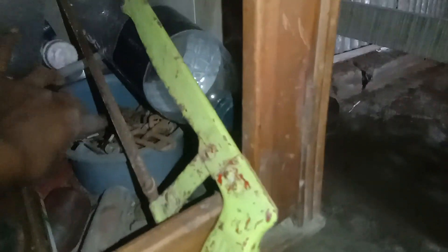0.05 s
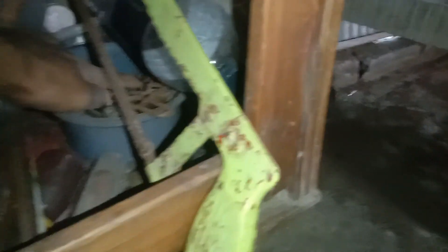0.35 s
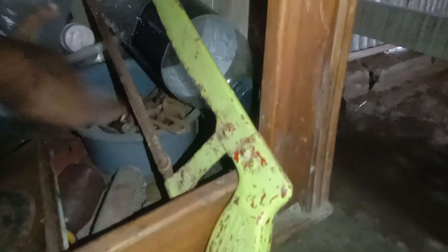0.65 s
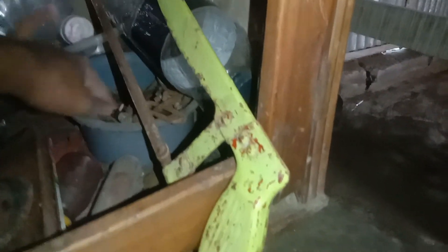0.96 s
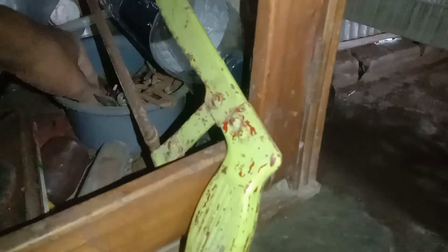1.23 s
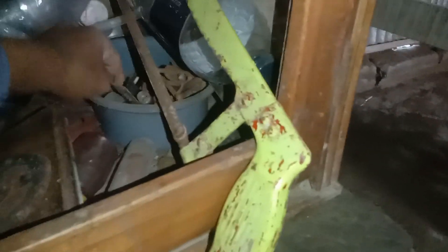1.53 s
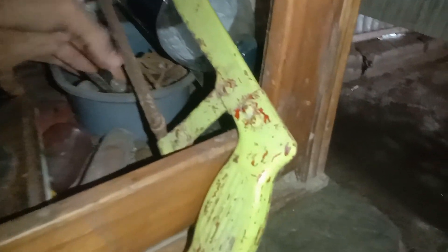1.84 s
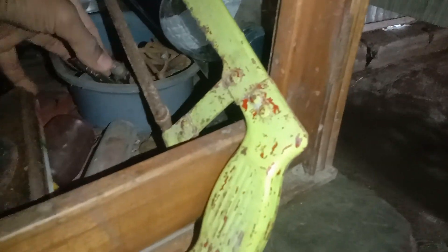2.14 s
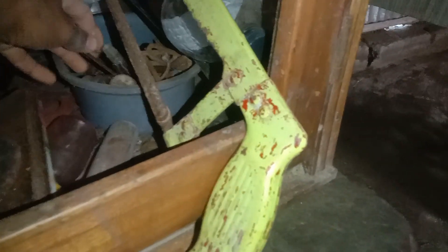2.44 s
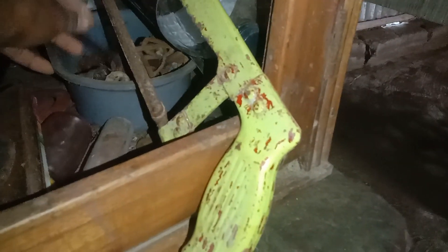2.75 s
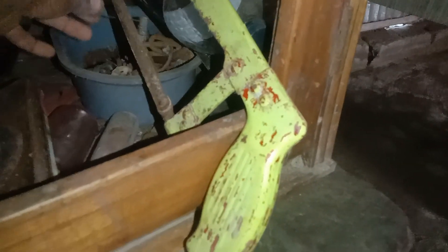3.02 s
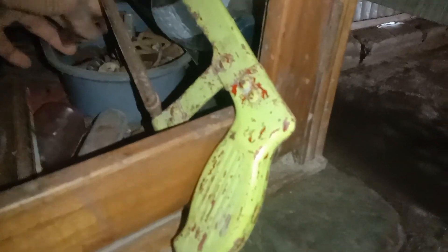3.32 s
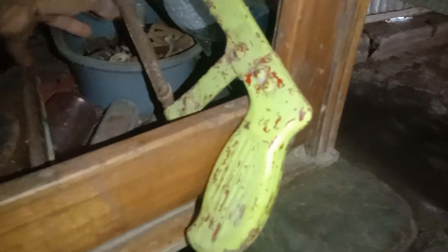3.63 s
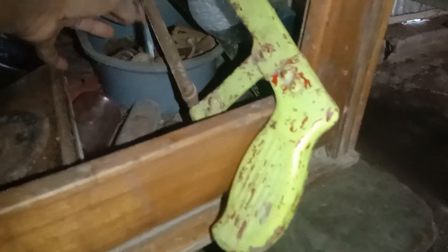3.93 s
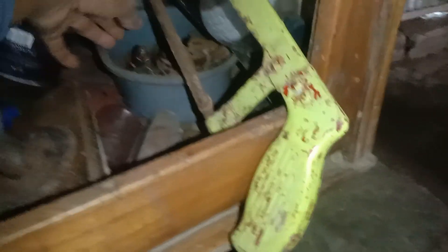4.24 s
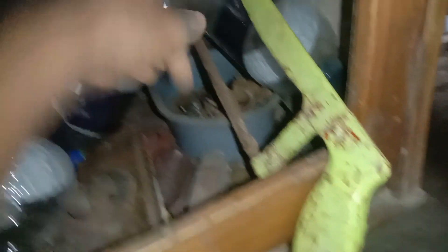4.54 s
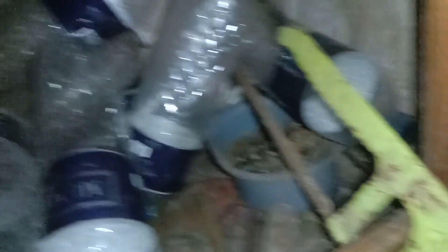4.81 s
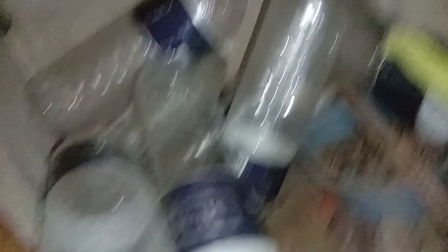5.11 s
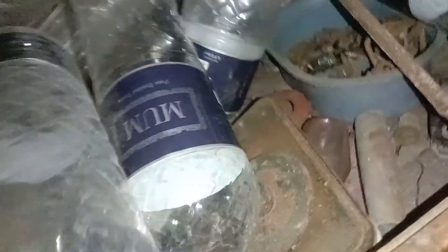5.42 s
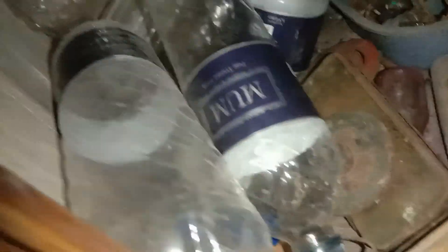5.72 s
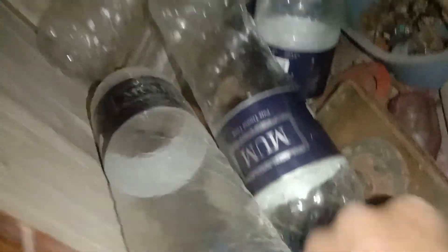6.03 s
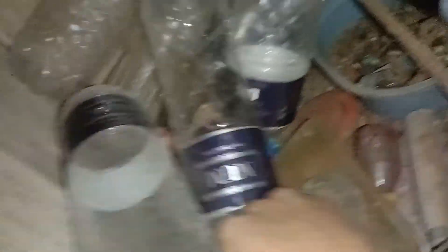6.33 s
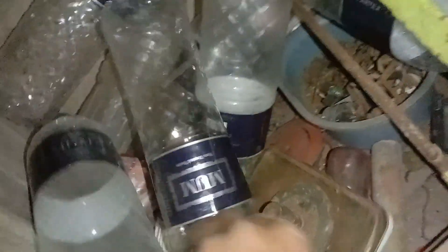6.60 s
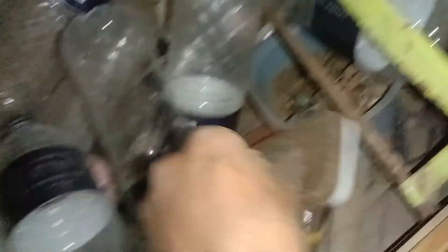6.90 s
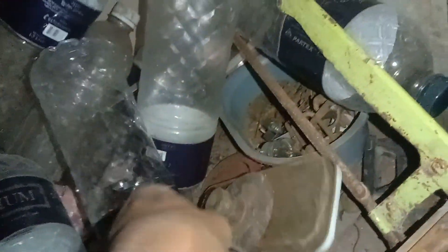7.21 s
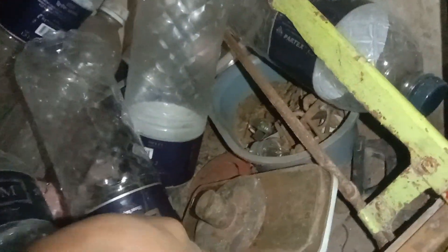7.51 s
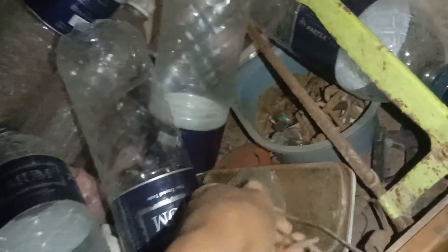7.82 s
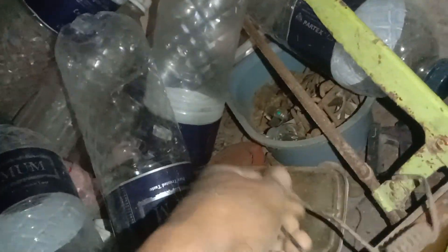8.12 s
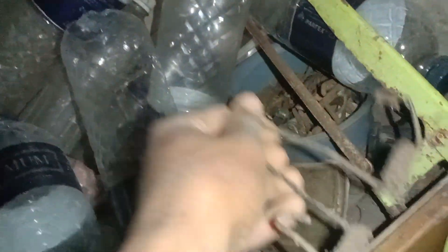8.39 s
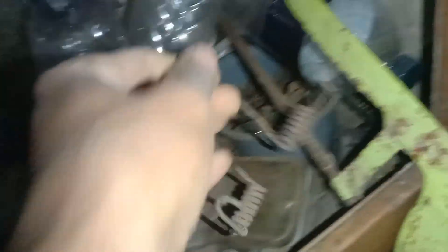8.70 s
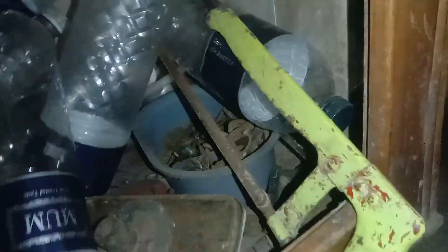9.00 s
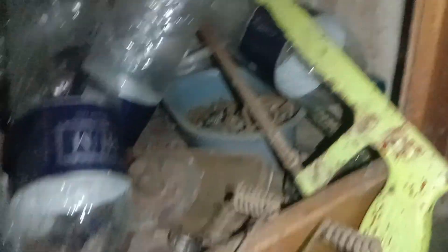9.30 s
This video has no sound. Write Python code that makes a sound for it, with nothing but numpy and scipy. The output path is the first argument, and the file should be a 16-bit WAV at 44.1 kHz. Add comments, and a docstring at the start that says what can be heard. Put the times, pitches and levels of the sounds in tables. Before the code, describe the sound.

Close up in a small, quiet room, old iron pieces clatter and scrape inside a plastic tub, small parts ringing thinly as the tub knocks on wooden boards. The rummaging thins out and stops briefly. Then empty plastic bottles buckle, rub and bump as they are pushed around with a tray. A far engine hums barely audibly, and a piece of iron lands on the plastic tray with a clank and a short tumble.

```python
"""Scrap iron clatters in a plastic tub as a hand rummages through it, and small parts ring thinly.
The hand draws back with a swish, then shoves empty plastic bottles and a tray aside in a wooden cupboard.
Each hit is a snap and a short chatter, each push a stick-slip scrape, coloured by the hollow plastic.
At the end an iron piece drops and tumbles on the tray. The room is small; far away an engine speeds up."""
import sys
import numpy as np
from scipy import signal
from scipy.fft import rfft, irfft
from scipy.io import wavfile
from scipy.ndimage import uniform_filter1d

SR = 44100
rng = np.random.default_rng(int(sys.argv[2]) if len(sys.argv) > 2 else 0)


def output_pcm(signal):
    """Save a mono or channel-first signal as 16-bit PCM at the path in sys.argv[1].

    Samples are clipped to [-1, 1] before scaling.
    """
    pcm = np.clip(np.atleast_2d(signal).T, -1, 1) * 32767
    wavfile.write(sys.argv[1], SR, np.round(pcm).astype(np.int16))


N = 412322
TIME = np.arange(N) / SR
TOP_HZ = 15900

# Iron clashing in the tub. Each row: start in seconds, level in dB, bass and treble in dB
# against the mids, chatter decay time in seconds.
IRON_CLACKS = [(0.0, -10.5, -9, -9.5, 0.0029), (0.035, -11.5, -9, -35, 0.0035),
               (0.221, -16, 2, -12, 0.0032), (0.253, -17, 8.5, -13.5, 0.0055),
               (0.304, -16, -19.5, -13, 0.0072), (0.376, -12.5, -6.5, -18.5, 0.0079),
               (0.675, -13, -24.5, -26.5, 0.0048), (0.683, -15.5, -24, -18, 0.007),
               (0.694, -7.5, -23, -4.5, 0.0035), (0.722, -2, -12.5, -22.5, 0.0077),
               (0.865, -11.5, -20, -15.5, 0.0042), (0.889, -7, -18.5, -20.5, 0.0037),
               (0.985, -18.5, 1, -30, .005), (0.998, -10.5, -27, -18, 0.0021),
               (1.022, -6, -45, -8.5, 0.0037), (1.19, -22, -10, -47, 0.0028),
               (1.336, -21, -29, -12, 0.0076), (1.426, -7, -22, -49, 0.0033),
               (1.525, -11.5, -6.5, -35, 0.012), (1.588, -11.5, -2.5, -26, 0.011),
               (1.622, -3, -40, -12, 0.0045), (1.702, -24.5, 5, -17, 0.012),
               (1.768, -19.5, -13, -28, 0.012), (1.795, -22.5, -28.5, -19, 0.0069),
               (1.848, -22, -3, -26.5, 0.0042), (1.979, -19, -18.5, -31, .008),
               (2.079, -48, -21, 4, 0.0051), (2.129, -15.5, -18.5, -22.5, 0.0043),
               (2.235, -38, -17, 0.5, 0.0036), (2.281, -8.5, -8.5, -31, 0.0059),
               (2.316, -19.5, -0.5, -21, 0.0059), (2.354, -23.5, -13.5, -28, 0.021),
               (2.393, -24, -25.5, -6, 0.0072), (2.432, -18, -13.5, -30, .008),
               (2.464, -19, -21.5, -14.5, 0.0022), (2.521, -19, -18.5, -19.5, .005),
               (2.55, -22, -2, -44.5, 0.0069), (2.83, -15.5, -29, -11, 0.0081),
               (2.853, -16, -34.5, -7.5, 0.0087), (2.888, -19.5, -8, -10, 0.0051),
               (2.975, -24.5, 1, -31, 0.0061), (3.04, -25.5, 1, -13.5, .005),
               (3.103, -30, -10.5, -36, 0.0099), (3.274, -44.5, -29.5, -1, 0.0054),
               (3.439, -23.5, -6.5, -15, 0.0061), (3.723, -29, -8.5, -18.5, .012),
               (3.874, -23, -28.5, -13, 0.0025), (3.955, -31.5, -31.5, 0, 0.004),
               (3.994, -13, -51, -12.5, 0.0046), (4.02, -14.5, -42, -21, 0.0045),
               (4.08, -20.5, -26, -13, 0.0021), (4.113, -17.5, -11, -9, 0.0071),
               (4.258, -28.5, -7, -7, 0.0068), (4.431, -26.5, 7.5, -21.5, 0.017),
               (4.511, -28.5, 9, -24, 0.0073), (4.566, -34, 11, -23.5, 0.018)]
# Bottles and tray buckling and bumping. Each row reads as in IRON_CLACKS.
PLASTIC_BUMPS = [(5.292, -48.5, -14.5, -23, 0.0029), (6.153, -20, 2, -19, 0.0088),
                 (6.193, -14, 2.5, -40, 0.0077), (6.249, -14, -6, -37, 0.0041), (6.311, -23, 3, -19, 0.012),
                 (6.387, -13, -9, -44, 0.0095), (6.409, -11.5, -20.5, -42, 0.0044),
                 (6.487, -7, -19, -26.5, 0.0053), (6.551, -11.5, -4, -43, 0.01),
                 (6.636, -3, -17, -30, 0.013), (6.743, -8, -20.5, -17.5, .006),
                 (6.755, -4.5, -7, -26, 0.005), (6.806, -7.5, -5, -35, 0.0072),
                 (6.858, -10.5, -0.5, -19, 0.014), (6.904, -7.5, -8.5, -45, 0.0035),
                 (6.941, -15.5, -2.5, -19.5, .011), (7.024, -15, -23.5, -12.5, .025),
                 (7.109, -16, -30, -22, 0.0093), (7.244, -20, -16, -24.5, 0.003),
                 (7.598, -20.5, -13.5, -30.5, 0.0047), (7.645, -15.5, -19, -15, 0.011),
                 (7.699, -10.5, -13.5, -23.5, 0.018), (7.918, -0.5, -26.5, -27, 0.0077),
                 (7.978, 0, -12.5, -37.5, .0064), (7.987, -8, -12, -18, .0065),
                 (8.064, -21.5, -9.5, -19.5, 0.012)]
# The hand pushing through the scrap. Each row: start and length in seconds, level in dB,
# bass and treble in dB against the mids.
SCRAP_PUSHES = [(0.0, .36, -30, 5.5, -11), (0.52, 0.13, -43.5, -18, -9), (0.66, 0.12, -28.5, -7.5, -11),
                (0.8, 0.14, -42, 2.5, -6.5), (1.035, 0.057, -31.5, 0.5, -11), (1.14, .11, -48.5, -2, -10.5),
                (1.35, 0.099, -28, -12, -9), (1.62, 0.099, -33, 0, -7.5), (1.76, 0.22, -47.5, 9, -17),
                (1.99, 0.023, -44, -16, -9.5), (2.115, 0.18, -48, 1, -11), (2.275, 0.075, -30.5, -7, -7.5),
                (2.44, 0.014, -54, 0.5, 10), (2.56, 0.017, -57, 4, -5), (2.69, .03, -53.5, -12, -1),
                (2.74, 0.076, -42, -2, -7.5), (2.84, 0.029, -30.5, -11, -6), (2.93, 0.12, -47, 8, -13),
                (3.18, 0.044, -72, 10, -9), (3.335, 0.054, -44, 9.5, -14), (3.44, 0.2, -45, -0.5, -11),
                (3.7, 0.07, -52, 2, -14), (3.86, 0.16, -49, -16, -7), (4.07, 0.059, -35, -0.5, -10),
                (4.22, 0.092, -44.5, -2.5, -7), (4.36, 0.063, -68, -9, 8.5), (4.45, 0.17, -67, 21, -18)]
# Shoves of the bottles and tray. Each row reads as in SCRAP_PUSHES.
BOTTLE_SHOVES = [(5.97, .07, -65, -23, 0), (6.12, 0.26, -31.5, 0, -13), (6.41, 0.31, -30, 5, -13.5),
                 (6.71, .12, -22, -1, -16.5), (6.88, 0.11, -34.5, 3.5, -15), (7.035, 0.13, -26.5, -7, -2),
                 (7.26, 0.086, -34, -5.5, -14.5), (7.41, 0.037, -54.5, 3, -13),
                 (7.635, .08, -29, -5.5, -22.5), (7.745, 0.071, -25, -9, -21),
                 (7.94, 0.083, -29, -0.5, -13), (9.175, 0.16, -49, -22, -17)]
# The hand drawing back. Each row reads as in SCRAP_PUSHES.
HAND_SWISHES = [(4.76, 0.042, -56.5, -13.5, -4), (4.9, 0.14, -83.5, -1.5, 6)]
# Dull knocks of the tub on the boards. Each row: start in seconds, level in dB, pitch in Hz.
TUB_THUDS = [(0.252, -9, 555), (0.751, -11.5, 414), (1.039, -13, 538), (1.138, -21, 530), (1.54, -12, 301),
             (1.596, -4, 581), (1.954, -21.5, 283), (2.55, -17.5, 542), (2.888, -18.5, 362),
             (3.017, -15.5, 144.5), (3.36, -21, 251), (4.052, -26, 363), (4.428, -14.5, 218),
             (4.508, -24.5, 228.7), (6.62, -5.5, 396), (6.856, -9.5, 514)]
# An iron piece landing and tumbling. Each row: start in seconds, level in dB, tilt in dB per octave.
DROP_HITS = [(8.942, -45.5, 14), (9, -5.5, 3), (9.027, -14.5, -1), (9.251, -12, 5.5), (9.279, -14, 3),
             (9.298, -19, -4)]
# That piece and the tray ringing together. Each row: pitch in Hz, level in dB, t60 in seconds.
DROP_MODES = [(443, 1, 0.075), (789, 5, 0.1), (883, 7, 0.088), (964, -9, 0.2), (1044, 2, 0.2),
              (1550, -16, 0.091), (1900, -13.5, 0.15), (2170, -25, 0.11), (2360, 3.5, 0.063),
              (2620, -9.5, 0.089), (3130, -7, 0.093), (3200, -29, 0.11), (5550, -16.5, 0.04)]
# Small iron parts set ringing. Each row: start in seconds, level in dB, part number.
PART_PINGS = [(0.695, -25.5, 0), (0.809, -33.5, 0), (0.889, -29, 0), (1.45, -35, 0), (1.499, -29, 1),
              (3.415, -19, 2), (3.955, -26.5, 2), (4.015, -21.5, 2), (4.092, -19.5, 2), (4.107, -22, 2),
              (7.931, -26, 2)]
# Their modes. Each row: part number, pitch in Hz, level in dB, t60 in seconds.
PART_MODES = [(0, 6820, 0, .22), (0, 8430, -7.5, 0.14), (0, 13450, 3, 0.048), (1, 6220, 1.5, .2),
              (1, 8700, -8, 0.1057), (1, 12250, -9, 0.061), (2, 4200, -5.5, .12), (2, 4935, -6, 0.17),
              (2, 5168, -5.5, .08), (2, 5480, -1, 0.055), (2, 11340, -23, .1), (2, 15000, -16, 0.065)]
# Broad tone of the tub and of the bottles. Each row: frequency in Hz, gain in dB.
TUB_TONE = [(50, -34), (100, -4), (220, 4.5), (500, 0.5), (680, -10), (1150, -4), (2700, -8.5),
            (3800, -19.5), (5900, -19), (7800, -40.5), (10000, -38.5), (14500, -29.5), (16000, -29.5)]
BOTTLE_TONE = [(50, -21.5), (100, 1.5), (220, 4.5), (500, 2), (680, -9.5), (1150, -8), (2800, -5),
               (3800, -17), (5900, -16.5), (7800, -38), (10000, -38), (14500, -22), (16000, -54)]
# Their hollow resonances. Each row: centre in Hz, width in Hz, boost in dB.
TUB_RESONANCES = [(252, 40, 1.6), (427, 5, 0.9), (536, 32, 3.9), (827, 20, 2.8), (1154, 170, 2.4),
                  (2583, 200, 3), (4700, 80, 1.3), (5350, 110, 3.3)]
BOTTLE_RESONANCES = [(337, 18, 5.7), (440, 8.3, 2.5), (518, 39, 4), (857, 40, 5.6), (1100, 150, 8.9),
                     (1220, 130, 4.4), (1456, 45, 2.36), (1650, 20, 10), (2310, 55, 4.5), (2480, 100, 4.9),
                     (4240, 39, 1.2)]
# The two crossovers in Hz: bass to mids, then mids to treble.
CROSSOVERS_HZ = [700, 3500]
# The room's decay. Each row: frequency in Hz, t60 in seconds.
ROOM_DECAY = [(100, 0.47), (300, 0.15), (1000, 0.13), (3000, 0.14), (12000, 0.092)]
# The engine's hum. Each row: multiple of the firing rate, level in dB.
ENGINE_ORDERS = [(.5, -23.5), (1, 3), (1.5, -11.5), (2, -21.5)]
# The tone of still air. Each row: frequency in Hz, gain in dB.
AIR_TONE = [(25, -23), (70, -5.5), (150, -22.5), (400, -36), (1300, -31), (2600, -37), (6000, -44),
            (9000, -53.5), (14000, -47), (16000, -54)]


def contacts(rows, bands, mid_db, bass_db, treble_db, snap_db, rise, ring_db, ring_t60, dulling,
             heavy_hz, light_hz, light_below_db, size=4000):
    """Each hit is a snap and a dying chatter; the struck piece adds a damped ring, higher when light."""
    out, t = np.zeros(N), np.arange(size) / SR
    for start, db, bass, treble, chatter_s in rows:
        age = t / max(chatter_s, .0005)  # in chatter times, so long contacts also start softly
        force = rng.standard_normal(size) * (1 - np.exp(-age / rise)) * np.exp(-age)
        force[0] = amp(snap_db)
        lightness = 1 / (1 + np.exp((bass - light_below_db) / 2.5))  # light pieces make little bass
        hz = heavy_hz * (light_hz / heavy_hz) ** lightness * np.exp(.07 * rng.standard_normal())
        overtones = hz * np.cumprod(rng.uniform(1.3, 1.7, 7))  # an irregular shape rings inharmonically
        piece = ring([(hz, 0, ring_t60)] + [(f, -2, ring_t60) for f in overtones if f < TOP_HZ], size)
        freedom = 2 / (1 + amp(2 * bass + 4.5))  # heavy, dull contacts hold the piece still
        force = unit(force) + freedom * amp(ring_db) * unit(signal.fftconvolve(force, piece)[:size])
        drives = (force, force, force * np.exp(-dulling * age))  # later bounces carry less treble
        for drive, response, band_db in zip(drives, bands, (bass + bass_db, mid_db, treble + treble_db)):
            hit = signal.fftconvolve(drive, response)
            add(out, start, amp(db + band_db) * hit / np.std(hit[:600]))
    return out


def scrape(rows, bands, trim_db, slips_per_s, spread_db, slip_s, rub_db, jingle_db, jingle_t60, grit,
           rise_db_per_s, ease_db_per_s, settle_db_per_s, ticks_per_s, tick_db, tick_s, grip_db, grip_s):
    """Stick and slip: brief uneven bursts over a steady rub, with stray ticks, through a hollow body."""
    t = TIME[(TIME > rows[0][0] - .5) & (TIME < rows[-1][0] + .5)]
    n, hop = len(t), 64
    slips = impulses(n, slips_per_s, spread_db, cap=3.5)
    pressure = unit(signal.lfilter(*one_pole(slip_s), slips)) + amp(rub_db)
    force = unit(pressure * rng.standard_normal(n)) + amp(jingle_db) * jingle(slips, jingle_t60)
    force /= np.sqrt(abs(uniform_filter1d(force ** 2, 3000)) + 1e-9)  # even out the slow swells
    catches = ticks(n, ticks_per_s, tick_s)
    gains = push_envelopes(rows, t[::hop], rise_db_per_s, ease_db_per_s, settle_db_per_s)
    grip = unit(signal.filtfilt(*one_pole(grip_s / hop), rng.standard_normal(gains.shape[1])))
    gains *= amp(np.outer(grip_db, grip))  # the grip comes and goes, most of all in the treble
    fizz = signal.lfilter([1, -grit], [1], bands[2])  # grit brightens the treble
    responses = (bands[0], bands[1], fizz / np.linalg.norm(fizz))
    out = np.zeros(N)
    for response, gain, trim, tick in zip(responses, gains, trim_db, tick_db):
        drive = (force + amp(tick) * catches) * amp(trim) * np.interp(t, t[::hop], gain)
        add(out, t[0], signal.oaconvolve(drive, response))
    return out


def jingle(slips, t60, count=30):
    """Every slip rings one of many small pieces."""
    struck = rng.integers(0, count, len(slips))
    pitches = np.geomspace(900, 14500, count) * rng.uniform(.95, 1.05, count)
    return unit(sum(signal.oaconvolve(slips * (struck == k), ring([(hz, 0, t60)], 4000))[:len(slips)]
                    for k, hz in enumerate(pitches)))


def ticks(n, per_s, decay_s):
    """Tiny sharp bursts of noise where edges catch."""
    clicks = impulses(n, per_s, spread_db=2, cap=2)
    return unit(signal.lfilter(*one_pole(decay_s), clicks) * rng.standard_normal(n))


def tub_thuds(response, trim_db=-4, push_s=0.003, boom_db=-2, boom_t60=0.096, size=1500):
    """The tub rocks on the boards: a soft push wakes one low, well damped resonance."""
    out, t = np.zeros(N), np.arange(size) / SR
    for start, db, hz in TUB_THUDS:
        push = signal.fftconvolve(rng.standard_normal(size) * np.exp(-t / push_s), response)
        age = np.arange(len(push)) / SR
        envelope = amp(boom_db - 60 * age / boom_t60) * (1 - np.exp(-age * hz * 2))
        boom = np.sin(2 * np.pi * hz * age) * envelope
        add(out, start, amp(db + trim_db) * (push / abs(push).max() + boom))
    return out


def iron_drop(bands, ring_db=-4.5, crack_db=-0.5, edge_db=-13.5, crack_s=0.006, size=2500):
    """A hard crack, then piece and tray ring together; glancing blows are brighter."""
    out, t = np.zeros(N), np.arange(size) / SR
    cushion = signal.butter(3, 6000, fs=SR)  # the plastic tray softens the blow
    for start, db, tilt in DROP_HITS:
        tone = ring([(hz, level + tilt * np.log2(hz / DROP_MODES[0][0]), t60)
                     for hz, level, t60 in DROP_MODES])
        attack = 1 - np.exp(-TIME[:len(tone)] / 0.00042)
        add(out, start, amp(db + ring_db) * tone * attack)
        response = bands[1] + amp(edge_db + tilt) * signal.lfilter(*cushion, bands[2])
        crack = signal.fftconvolve(rng.standard_normal(size) * np.exp(-t / crack_s), response)
        add(out, start, amp(db + crack_db) * crack / abs(crack).max())
    return out


def iron_pings(trim_db=-2, spread_db=3, detune=.008):
    """Small parts ring as they come free of the heap; each strike weights the modes differently."""
    out = np.zeros(N)
    for start, db, part in PART_PINGS:
        modes = [(hz * (1 + detune * rng.standard_normal()), level + spread_db * rng.standard_normal(), t60)
                 for owner, hz, level, t60 in PART_MODES if owner == part]
        add(out, start, amp(db + trim_db) * ring(modes))
    return out


def hand_swish(bands, grit=0.51):
    """The hand draws back: a smooth rub with no catching edges."""
    rub = rng.standard_normal(N)
    fizz = signal.lfilter([1, -grit], [1], bands[2])
    gains = push_envelopes(HAND_SWISHES, TIME, rise_db_per_s=300, ease_db_per_s=10,
                           settle_db_per_s=[330] * 3)
    return sum(gain * unit(signal.oaconvolve(rub, response)[:N])
               for gain, response in zip(gains, (bands[0], bands[1], fizz)))


def hollow_body(tone, resonances):
    """Bass, mid and treble impulse responses of a hollow object: a broad tone with resonant peaks."""
    hz = np.fft.rfftfreq(8192, 1 / SR)
    peaks_db = sum(boost / (1 + (2 * (hz - centre) / width) ** 2) for centre, width, boost in resonances)
    db = curve_at(tone, hz) + peaks_db
    low, high = (1 / (1 + (hz / edge) ** 10) for edge in CROSSOVERS_HZ)
    return [minimum_phase(db + 10 * np.log10(share + 1e-12)) for share in (low, high - low, 1 - high)]


def room(x, build_s=0.0055, shifts_per_s=1.082, count=3):
    """Dense reflections of a small room; crossfading tails make the pattern shift slowly over time."""
    out = np.zeros(N)
    for k in range(count):
        hz, t, noise = signal.stft(rng.standard_normal(SR // 2), SR, nperseg=256)
        decay = amp(-60 * t / curve_at(ROOM_DECAY, hz)[:, None])
        tail = signal.istft(noise * decay, SR, nperseg=256)[1]
        tail *= np.minimum(np.arange(len(tail)) / (build_s * SR), 1)
        share = np.sqrt(2 / count) * np.cos(np.pi * (shifts_per_s * TIME + k / count))
        out += signal.oaconvolve(x * share, tail / np.linalg.norm(tail))[:N]
    return out


def distant_engine(level_db=-50, near_s=8.0, off_s=9.1, near_hz=70.4, climb_hz_per_s=7.5):
    """Only an accelerating engine's lowest orders pass the walls; it swells, holds and cuts off."""
    firings = np.cumsum(near_hz + climb_hz_per_s * (TIME - near_s)) / SR
    hum = sum(amp(db) * np.sin(2 * np.pi * (order * firings + rng.random()))
              for order, db in ENGINE_ORDERS)
    away_db = 9 * np.maximum(near_s - TIME, 0) + 130 * np.maximum(TIME - off_s, 0)
    return unit(hum) * amp(level_db - away_db)


def air(level_db=-67):
    """A faint, steady bed of noise, mostly low rumble."""
    tone = amp(curve_at(AIR_TONE, np.fft.rfftfreq(N, 1 / SR)))
    return amp(level_db) * unit(irfft(rfft(rng.standard_normal(N)) * tone, N))


def push_envelopes(rows, t, rise_db_per_s, ease_db_per_s, settle_db_per_s):
    """Bass, mid and treble gains: each push builds quickly, eases while it lasts, then settles."""
    power = np.zeros((3, len(t)))
    for start, length, db, bass, treble in rows:
        push = db - rise_db_per_s * np.maximum(start - t, 0)
        push -= ease_db_per_s * np.clip(t - start, 0, length)
        settle = np.outer(settle_db_per_s, np.maximum(t - start - length, 0))
        power += amp(push + np.array([[bass], [0], [treble]]) - settle) ** 2
    return np.sqrt(power)


def ring(modes, size=14000):
    """Freely dying modes, each given as Hz, dB and t60; the sum peaks at 1."""
    t = np.arange(size) / SR
    x = sum(amp(db - 60 * t / t60) * np.sin(2 * np.pi * (hz * t + rng.random())) for hz, db, t60 in modes)
    return x / abs(x).max()


def impulses(n, per_s, spread_db, cap):
    """Randomly timed spikes of uneven size."""
    return (rng.random(n) < per_s / SR) * amp(spread_db * np.minimum(rng.exponential(1, n), cap))


def one_pole(decay_s):
    """Filter coefficients for an exponential decay."""
    return [1], [1, -np.exp(-1 / (decay_s * SR))]


def minimum_phase(db):
    """The tightest impulse response for a gain curve, with energy 1."""
    log_gain = np.log(amp(np.maximum(db, -100)))
    mirrored = np.concatenate([log_gain, log_gain[-2:0:-1]])
    response = irfft(np.exp(np.conj(signal.hilbert(mirrored)))[:len(db)])[:4096]
    return response / np.linalg.norm(response)


def curve_at(points, hz):
    """Reads a curve on a log-frequency axis."""
    point_hz, value = np.transpose(points)
    return np.interp(np.log(hz + 1), np.log(point_hz + 1), value)


def amp(db):
    """Decibels to gain."""
    return 10 ** (np.asarray(db) / 20)


def unit(x):
    """Scales to rms 1."""
    return x / np.sqrt(np.mean(x ** 2) + 1e-20)


def add(mix, start_s, sound):
    """Mixes a sound in at its start time."""
    part = mix[max(round(start_s * SR), 0):][:len(sound)]
    part += sound[:len(part)]


def suppress(x, threshold_db=-47, slope=0.22, depth_db=8, window=700):
    """Noise suppressor: above the bass, quiet moments are turned further down."""
    bass = signal.sosfiltfilt(signal.butter(4, 110, fs=SR, output="sos"), x)
    rest = x - bass
    level_db = 10 * np.log10(abs(uniform_filter1d(rest ** 2, window)) + 1e-12)
    cut_db = np.clip(slope * (threshold_db - level_db), 0, depth_db)
    return bass + rest * amp(-uniform_filter1d(cut_db, window))


def scene():
    """Scrap in the tub, then bottles and tray, in a small room over a far engine and still air."""
    tub = hollow_body(TUB_TONE, TUB_RESONANCES)
    bottles = hollow_body(BOTTLE_TONE, BOTTLE_RESONANCES)
    # flat plastic has only the broad resonances
    tray = hollow_body(BOTTLE_TONE, [row for row in BOTTLE_RESONANCES if row[1] > 70])
    scrap = contacts(IRON_CLACKS, tub, mid_db=-11, bass_db=-10, treble_db=-4.5,
                     snap_db=4.5, rise=0.4, ring_db=-11.5, ring_t60=0.019, dulling=0.22,
                     heavy_hz=1167.3, light_hz=2540, light_below_db=-25)
    scrap += scrape(SCRAP_PUSHES, tub, trim_db=[0, -0.5, -2.5], slips_per_s=300, spread_db=1,
                    slip_s=0.0041, rub_db=-6, jingle_db=-7.5, jingle_t60=0.038, grit=0.069,
                    rise_db_per_s=601, ease_db_per_s=11, settle_db_per_s=[250, 240, 260],
                    ticks_per_s=40, tick_db=[-14, -7, -1], tick_s=0.00076,
                    grip_db=[.6, 1.1, 2.2], grip_s=0.012)
    scrap += tub_thuds(tub[0]) + iron_pings() + hand_swish(tub)
    plastic = contacts(PLASTIC_BUMPS, bottles, mid_db=-10, bass_db=-5.5, treble_db=0.5,
                       snap_db=11, rise=0.35, ring_db=-11.5, ring_t60=0.023, dulling=.1,
                       heavy_hz=1160, light_hz=2440, light_below_db=-17.5)
    plastic += scrape(BOTTLE_SHOVES, bottles, trim_db=[0, -0.5, -1.5], slips_per_s=170, spread_db=4.5,
                      slip_s=0.0079, rub_db=1, jingle_db=-10.5, jingle_t60=0.044, grit=0.27,
                      rise_db_per_s=399.5, ease_db_per_s=5, settle_db_per_s=[270, 290, 310],
                      ticks_per_s=89, tick_db=[-14, -7, -4], tick_s=0.0026,
                      grip_db=[.6, 1.1, 2.5], grip_s=0.0064)
    plastic += iron_drop(tray)
    reverb = room(amp(-13.5) * scrap + amp(-11) * plastic)
    return (scrap + plastic + reverb + distant_engine() + air())[None]


def record(dry):
    """Quiet moments are turned down, the loudest peaks rounded off and the very top cut away."""
    rounded = np.tanh(suppress(dry))
    lowpass = signal.firwin(401, TOP_HZ, window=("kaiser", 9), fs=SR)
    return signal.oaconvolve(rounded, lowpass[None], "same")


dry = scene()
out = record(dry)
output_pcm(out)
```